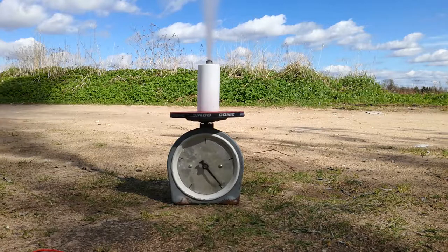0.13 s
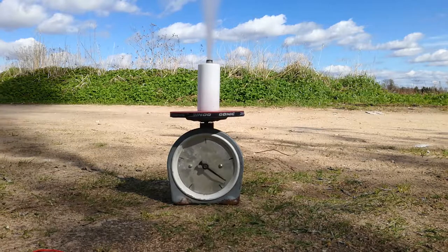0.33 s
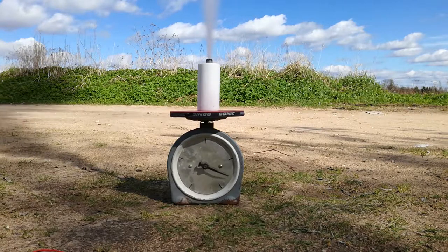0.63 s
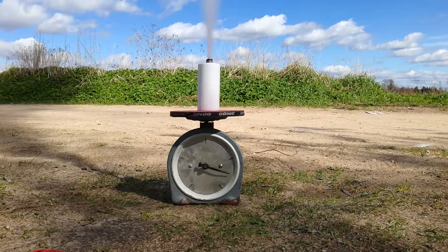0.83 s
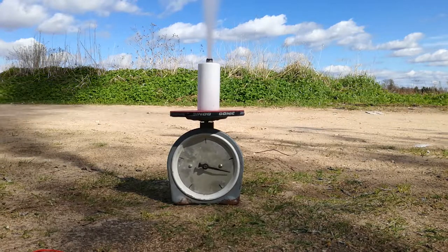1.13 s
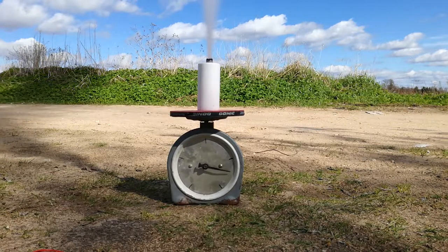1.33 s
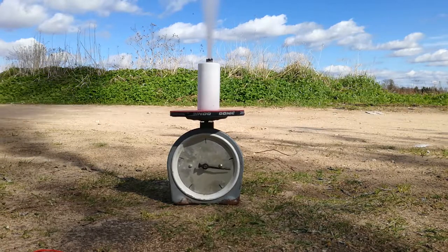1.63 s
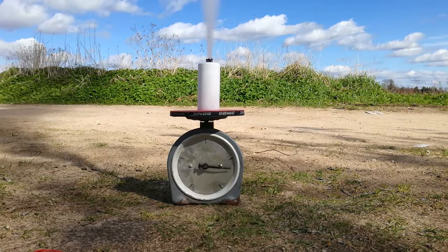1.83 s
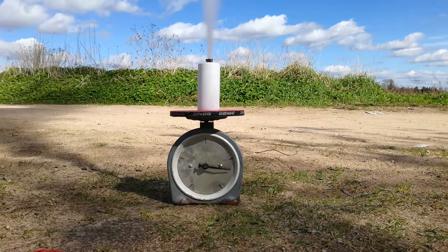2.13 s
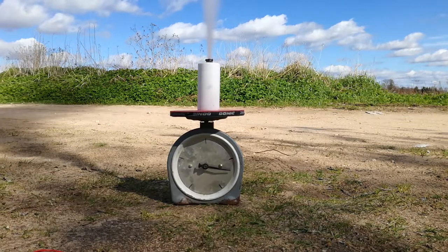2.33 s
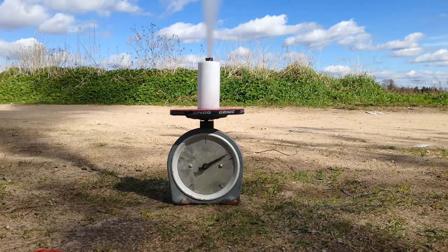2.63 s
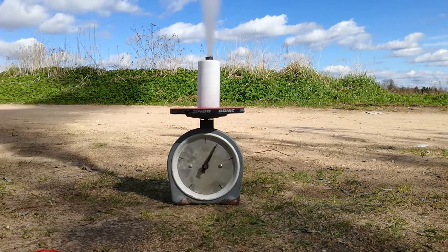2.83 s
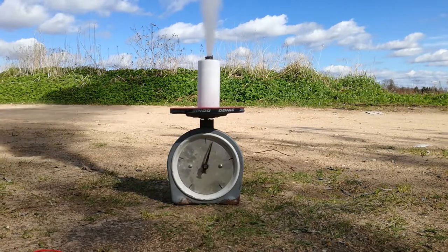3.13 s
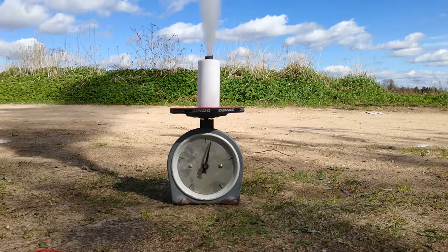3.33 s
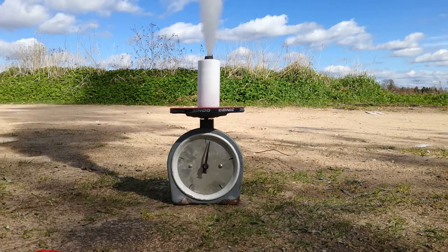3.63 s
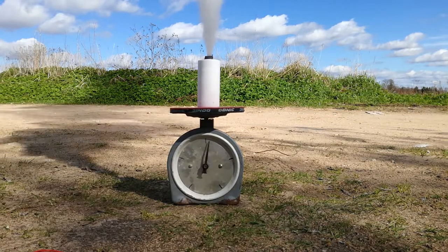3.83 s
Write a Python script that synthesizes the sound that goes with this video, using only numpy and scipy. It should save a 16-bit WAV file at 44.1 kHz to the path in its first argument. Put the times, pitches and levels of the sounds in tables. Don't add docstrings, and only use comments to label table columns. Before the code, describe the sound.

Loud rushing jet hiss from a small rocket motor in an open field, fading to near silence.

```python
import sys
import numpy as np
from scipy import signal
from scipy.fft import rfft, irfft
from scipy.io import wavfile
from scipy.ndimage import uniform_filter1d

SR = 44100
rng = np.random.default_rng(int(sys.argv[2]) if len(sys.argv) > 2 else 0)


def wrap_up_sound(samples):
    columns = np.atleast_2d(samples).T
    tamed = np.clip(columns, -1, 1)
    steps = np.round(tamed * 32767).astype(np.int16)
    wavfile.write(sys.argv[1], SR, steps)


def decibels_to_gain(level_db):
    exponent = np.asarray(level_db, float) / 20
    return 10 ** exponent


N = 176400
HZ = np.maximum(np.arange(N // 2 + 1) * SR / N, 1.)


def on_hz(table, hz):
    table = np.array(table)
    log_hz = np.log(np.maximum(table[:, 0], 1))
    return np.interp(np.log(hz), log_hz, table[:, 1])


def noise(colour):
    return rfft(rng.standard_normal(N)) * decibels_to_gain(on_hz(colour, HZ))


def walk(rate_hz):
    hold = int(SR / rate_hz)
    steps = np.repeat(rng.standard_normal(N // hold + 1), hold)
    slewed = uniform_filter1d(uniform_filter1d(steps, hold), hold)[:N]
    return slewed / slewed.std()


def port(resonances, share):
    response = 1
    for hz, width_hz, db in resonances:
        u = HZ / hz
        damping = 1j * u * width_hz / hz
        response = response * (1 - u ** 2 + damping * decibels_to_gain(share * db)) / (1 - u ** 2 + damping)
    return response


def flame(left, right, spread_db, left_lag_s):
    # hz, db_per_hz
    jet_colour = [(30, -33), (110, -27.5), (220, -11.5), (1200, 3), (4500, -1), (7500, -8), (10000, -16),
                  (16000, -12)]
    # hz, level_db
    plume_spread = [(150, -36), (750, -6), (1500, -17), (2600, 0), (5200, 0), (7600, -8), (9800, 0),
                    (15000, -3)]
    lag = np.exp(-2j * np.pi * HZ * left_lag_s)
    near = noise(jet_colour) * np.array([port(left, 1) * lag, port(right, 0.94)])
    far = np.array([noise(jet_colour) * port(p, 0.7) for p in (left, right)])
    both = near + far * decibels_to_gain(on_hz(plume_spread, HZ) + spread_db)
    core = (HZ > 1000) & (HZ < 6000)
    return both * N / np.sqrt(2 * np.sum(abs(both.mean(axis=0)[core]) ** 2))


def jet(t):
    # time_s, level_db
    thrust = [(0, -21.5), (.3, -23), (.8, -24.5), (1.3, -24.5), (1.75, -25.5), (2.25, -24.5), (2.56, -25),
              (2.63, -29.5), (2.7, -33.5), (2.85, -37), (3.2, -43.5), (3.57, -52), (3.65, -61.5),
              (3.8, -69), (4, -80.5)]
    # hz, db_per_db
    dulling = [(40, -0.7), (120, -0.36), (300, 0.34), (900, 0.36), (1800, -0.1464), (4000, -0.02),
               (7000, 0.04), (12000, 0.26)]
    # hz, width_hz, gain_db
    left_long = [(270, 190, 2.5), (849, 2410, -26.5), (1850, 1900, 6), (2905, 1170, -16), (4800, 990, -9),
                 (9960, 1000, 7), (12900, 8000, 1.5)]
    right_long = [(270, 170, 3), (634, 1210, -16), (2322, 740, -7), (3350, 550, 1), (4140, 720, -6.5),
                  (5080, 1000, 5.5), (12420, 4900, -6)]
    # hz, width_hz, gain_db
    left_short = [(1050, 1000, -27), (2200, 1100, -1.5), (3320, 900, -15), (5100, 760, -8.5),
                  (8900, 1200, -1.5), (12100, 8000, 5.5)]
    right_short = [(686, 790, -12.5), (2450, 220, -3.5), (2870, 920, -10.5), (5060, 320, -5.5),
                   (5800, 900, 3), (11500, 7000, -5)]
    full_db, weak_db, weak_range_db = -24, -30, 3
    swell_db, flicker_db, eddy_db, rumble_db = .35, 0.47, 0.5, 1

    level_db = np.interp(t, *np.array(thrust).T)
    fall_db = level_db - full_db
    long_flame = flame(left_long, right_long, spread_db=0, left_lag_s=.00008)
    short_flame = flame(left_short, right_short, spread_db=-2, left_lag_s=.000074)
    long_share = 1 / (1 + np.exp((weak_db - level_db) / weak_range_db * 2))
    long_gain, short_gain = np.sqrt(long_share), np.sqrt(1 - long_share)
    swell, eddy = walk(4.79), walk(400)
    roar = 0
    for hz in 25 * 2 ** np.arange(0, 10, .5):
        mask = np.cos(np.pi * np.clip(np.log2(HZ / hz), -.5, .5)) ** 2
        bass = np.clip(1.5 - hz / 500., 0, 1)
        db = level_db + on_hz(dulling, hz) * fall_db
        db = db + swell_db * swell + flicker_db * walk(14)
        db = db + (1 - bass) * eddy_db * eddy + bass * rumble_db * walk(24.92)
        band = long_gain * irfft(long_flame * mask, N) + short_gain * irfft(short_flame * mask, N)
        roar = roar + decibels_to_gain(db) * band
    return roar


def pops(t):
    # time_s, peak_db
    slag = [
        (0.014, -25),
        (0.755, -29),
        (1.196, -28),
        (1.247, -29),
        (2.272, -26),
    ]
    pop_hz, width_s, late_s, trim_db = 380, .0012, .0053, 2
    total = 0
    for start_s, peak_db in slag:
        d = t - start_s - late_s
        swing = np.exp(-(d / width_s) ** 2) * np.sin(2 * np.pi * pop_hz * d)
        total = total + decibels_to_gain(peak_db + trim_db) * swing
    return total


def field(t):
    # hz, db_per_hz
    murmur = [(20, -16), (60, -9), (110, -6), (280, -6), (600, -10), (1000, -16), (1500, -21.5)]
    level_db, side_db, sag_db_per_s = -75.5, -30.5, -6.5
    mid, side = (irfft(noise(murmur + [(2600, -39.5)]), N) for _ in range(2))
    both = mid + decibels_to_gain(side_db) * side * np.array([[1], [-1]])
    return both / mid.std() * decibels_to_gain(level_db + sag_db_per_s * (t - 4) + 1.5 * walk(6))


def scene():
    t = np.arange(N) / SR
    return jet(t) + pops(t) + field(t)


def band_limit(x):
    return signal.sosfilt(signal.butter(12, 17080, fs=SR, output="sos"), x)


def record(dry):
    top_cut = signal.ellip(14, .3, 90, 15720, fs=SR, output="sos")
    bass_trim = signal.butter(1, 70, "high", fs=SR, output="sos")
    mix = signal.sosfilt(np.vstack([top_cut, bass_trim]), dry)
    return band_limit(mix)


dry = scene()
out = record(dry)
wrap_up_sound(out)
```